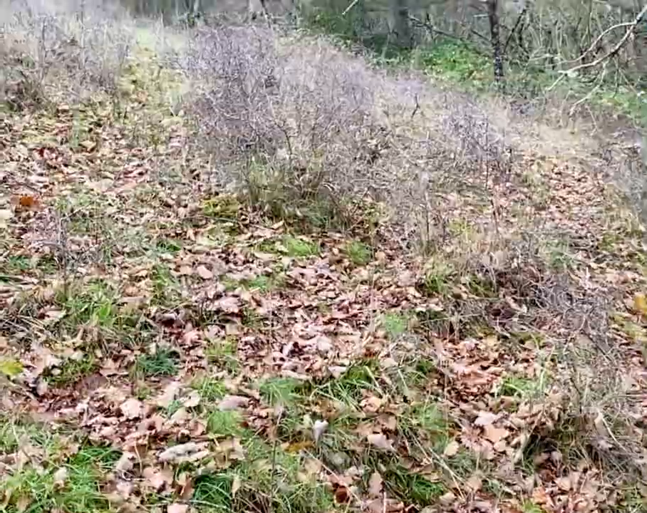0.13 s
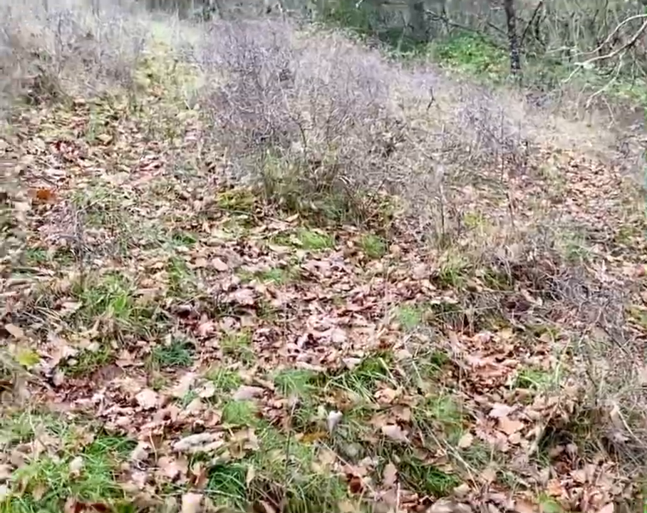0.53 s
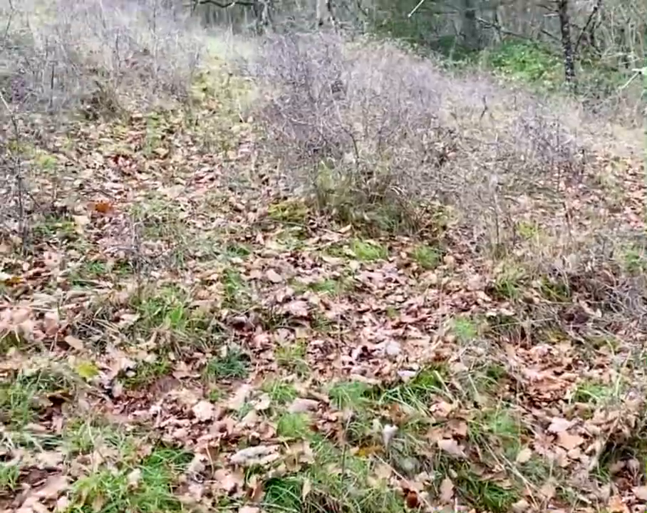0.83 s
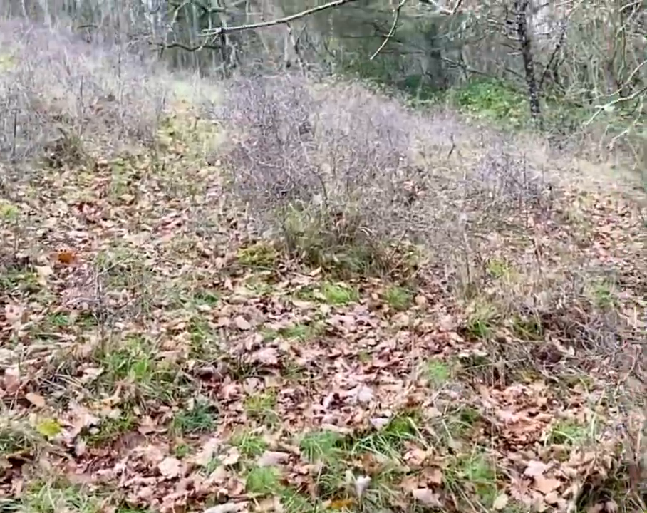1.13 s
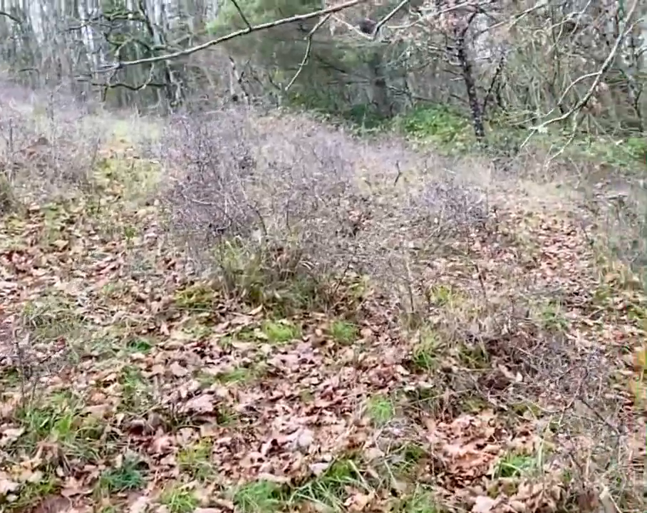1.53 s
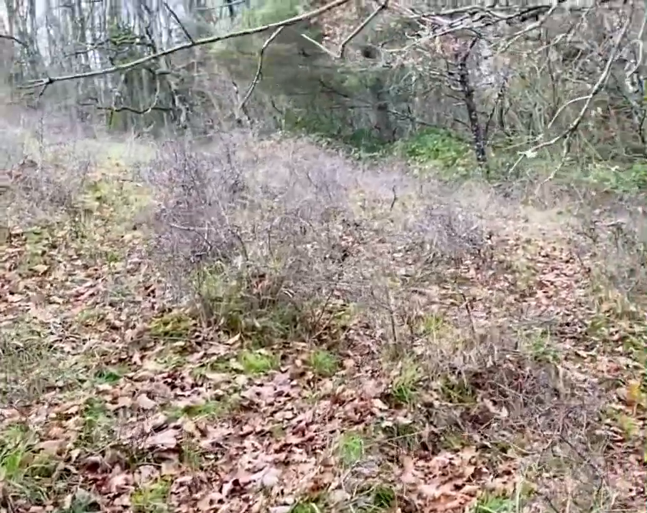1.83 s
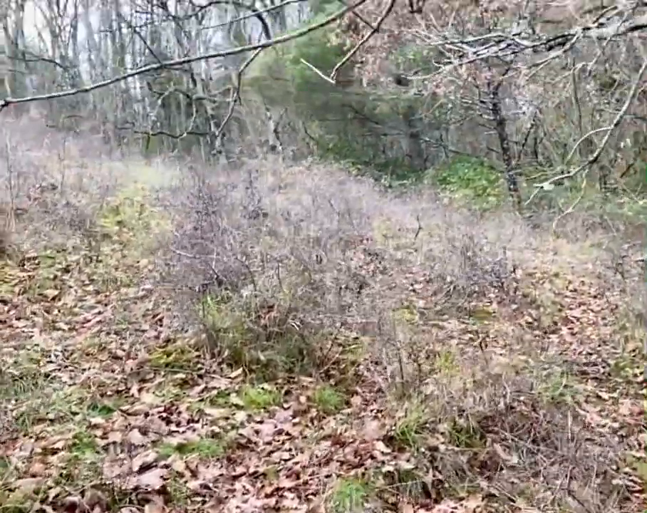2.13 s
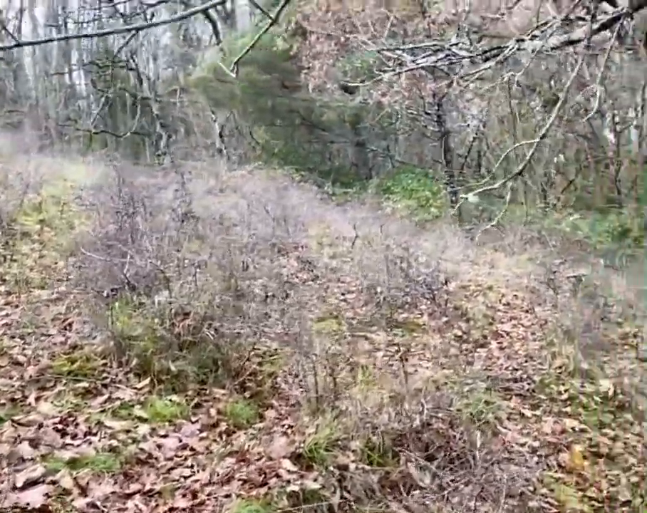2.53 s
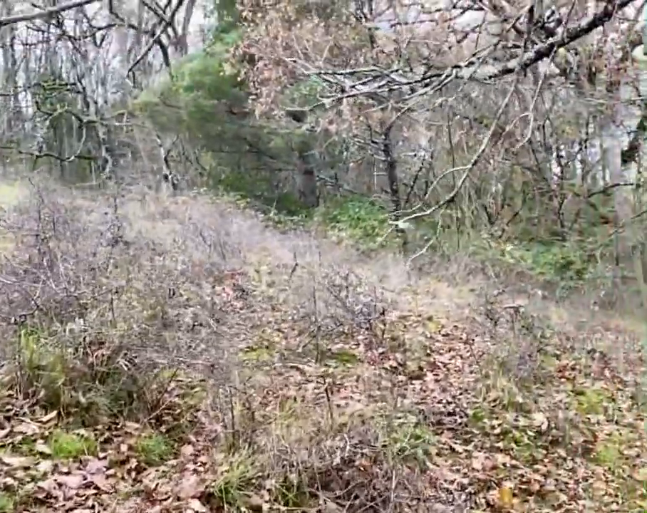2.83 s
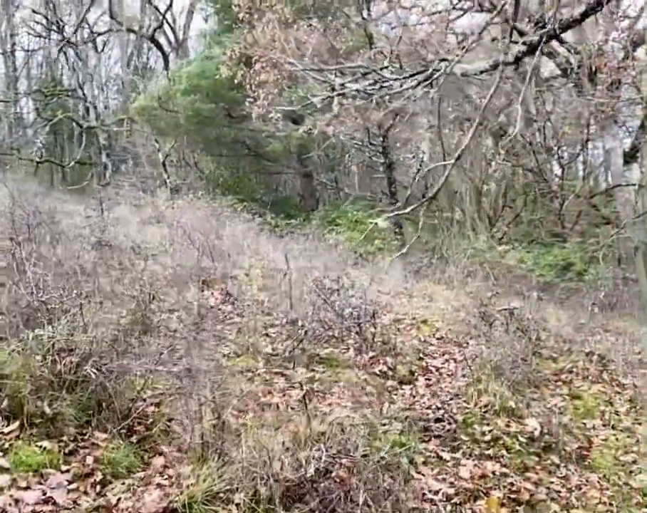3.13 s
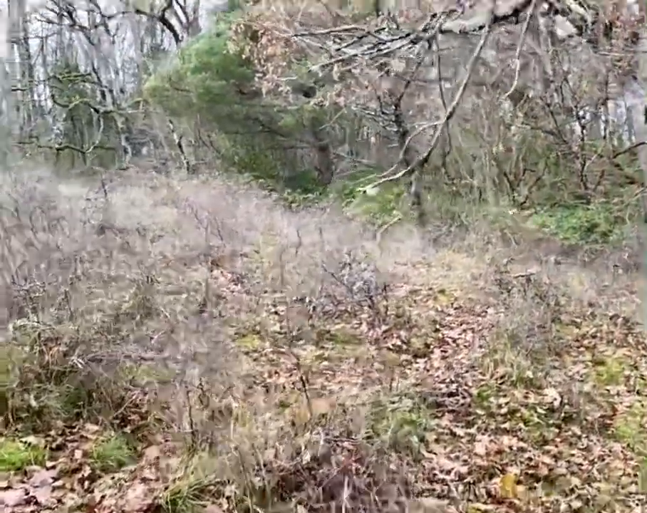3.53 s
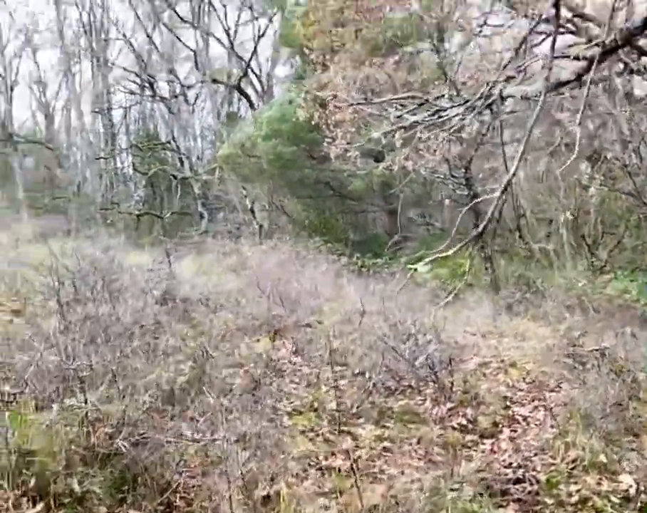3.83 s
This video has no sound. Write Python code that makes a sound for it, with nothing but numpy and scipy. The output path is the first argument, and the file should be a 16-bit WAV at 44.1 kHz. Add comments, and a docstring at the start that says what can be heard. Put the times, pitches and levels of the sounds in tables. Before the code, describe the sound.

After a near-quiet start with a dull handling knock, leaves rustle from about one second, then crunch strongly near three seconds with crisp twig cracks; close stereo outdoor pickup, dry, with little reverberation.

```python
"""A quiet wood: slow footsteps through dry leaves and brush, heard from the walker's hand.
Moves of the feet stir leaves (bright granular noise), crunch litter (darker grains) and tick stems (short sines).
Twigs snap (noise cracks and ringing modes), and grass and a sleeve brush past (shaped noise).
Soft knocks near by are sinking tones with ticks; the air is a faint hush and rumble, with a narrow whistling.
"""
import sys
import numpy as np
from scipy import signal
from scipy.fft import rfft, irfft, next_fast_len
from scipy.io import wavfile
from scipy.ndimage import uniform_filter1d, map_coordinates

SR = 44100
rng = np.random.default_rng(int(sys.argv[2]) if len(sys.argv) > 2 else 0)


def generate_wav(sig):
    """Save sig (samples, or channels by samples) to the path in sys.argv[1] as 16-bit PCM at SR."""
    pcm = np.round(np.clip(np.atleast_2d(sig).T, -1, 1) * 32767).astype(np.int16)
    wavfile.write(sys.argv[1], SR, pcm)


N = 176400
TOP_HZ = 15800  # band limit

# Level difference between the ears. Each row: frequency in Hz, left minus right in dB.
LEFT_MINUS_RIGHT = [(200, 2), (700, 2), (1300, -1), (2400, 1), (4400, 8), (8000, 3.5), (12000, -1.5)]


def amp(db):
    """Decibels to gain."""
    return 10 ** (np.asarray(db) / 20)


def unit(x):
    """Scale to rms 1."""
    return x / np.sqrt(np.mean(x ** 2) + 1e-20)


def along(points, hz):
    """Read (Hz, value) points on a log frequency axis."""
    f, v = np.transpose(points)
    return np.interp(np.log(hz + 1), np.log(f + 1), v)


def level_curve(points):
    """Join (s, dB) points by straight lines; silent outside them."""
    return np.interp(np.arange(N) / SR, *np.transpose(points), left=-np.inf, right=-np.inf)


def wobble(knots_per_s):
    """A smooth random curve through normal random knots."""
    return map_coordinates(rng.standard_normal(4096), [np.arange(N) * knots_per_s / SR], mode="wrap")


def filtered(x, response):
    """Multiply the spectrum of x by a function of frequency."""
    m = next_fast_len(N + SR // 2)
    return irfft(rfft(x, m) * response(np.fft.rfftfreq(m, 1 / SR)), m)[..., :N]


def colour(x, spectrum):
    """Shape x by a spectrum, keeping the power of white noise."""
    return filtered(x, lambda hz: unit(amp(along(spectrum, hz))))


def add(track, s, sound):
    """Mix a short sound into a track at time s."""
    part = track[..., max(0, round(s * SR)):][..., :sound.shape[-1]]
    part += sound[..., :part.shape[-1]]


def microphones(three, spectrum):
    """One shared and two separate noises become a coloured left and right at rms 1."""
    # Each row: frequency in Hz, share of power common to both sides (0 to 1).
    likeness = [(100, 0.74), (400, 0.37), (1200, 0.79), (2000, 0.88), (3500, 0.21), (7000, 0.15),
                (10000, 0.59), (14000, 1)]
    # Each row: frequency in Hz, phase by which left leads in radians.
    left_lead = [(100, 0.5), (1000, 0.54), (1800, -1), (2600, -0.5), (3700, 1.74), (5400, 2), (8300, 4.5),
                 (10000, -2), (12500, -1.5)]
    m = next_fast_len(N + 8192)
    hz, z = np.fft.rfftfreq(m, 1 / SR), rfft(three, m)
    sides = np.array([[.5], [-.5]])
    alike = np.clip(along(likeness, hz), 0, 1)
    shared = z[0] * np.sqrt(alike) * np.exp(1j * sides * along(left_lead, hz))
    pair = shared + z[1:] * np.sqrt(1 - alike)
    gain = amp(along(spectrum, hz) + sides * along(LEFT_MINUS_RIGHT, hz))
    return unit(irfft(pair * gain, m)[:, :N])


def patchy(x):
    """Let the colour of a noise drift in small patches of time and frequency."""
    depth_db = 2  # rms
    z = signal.stft(x, nperseg=512)[2]
    field = rng.standard_normal(z.shape[1:])
    field = uniform_filter1d(field, size=6, axis=0)
    field = uniform_filter1d(field, size=7, axis=1)
    return signal.istft(z * amp(depth_db * unit(field)), nperseg=512)[1][:, :N]


def narrow(hz, half_width_hz):
    """Stereo noise in one resonance, at rms 1."""
    noise = rng.standard_normal((2, N))
    return unit(filtered(noise, lambda f: 1 / (1 + ((f - hz) / half_width_hz) ** 2)))


def air():
    """Faint swaying hush of the wood, and a low rumble that is strongest near the end."""
    # Spectra of hush and rumble. Each row: frequency in Hz, relative level in dB per Hz.
    hush_spectrum = [(20, -30), (40, -30), (58, -1), (100, -3), (200, -8.5), (450, -12), (1300, -10.5),
                     (2500, -23), (3500, -27.5), (5200, -22), (10000, -30.5), (15000, -64)]
    rumble_spectrum = [(20, -19), (42, -17), (58, -2.5), (80, -10), (150, -14), (400, -19.5), (1200, -50)]
    # Level paths. Each row: time in seconds, level in dB.
    hush_path = [(0, -80.5), (.3, -67.5), (1.35, -71), (2.2, -71), (3.3, -71), (4, -67.5)]
    rumble_path = [(0, -77.5), (.3, -66.5), (.8, -71), (2.5, -87.5), (3.1, -69), (3.6, -62), (4, -64.5)]
    sway_db, sway_knots_per_s = 4, 8.1
    t = np.arange(N) / SR
    hush = patchy(microphones(rng.standard_normal((3, N)), hush_spectrum))
    rumble = microphones(rng.standard_normal((3, N)), rumble_spectrum)
    hush_db = np.interp(t, *np.transpose(hush_path)) + sway_db * wobble(sway_knots_per_s)
    rumble_db = np.interp(t, *np.transpose(rumble_path))
    return amp(hush_db) * hush + amp(rumble_db) * rumble


def knocks():
    """Soft knocks near by: a dry, chattering tick, a hollow thud that sinks in pitch and a faint scuff."""
    # Each row: start in seconds, thud level in dB, thud pitch in Hz, tick level in dB, tick low-pass in Hz.
    knock_rows = [(.082, -53, 546, -39.5, 1800), (.146, -54, 547, -42, 7000),
                  (0.4645, -26.5, 497, -22.5, 8900), (0.492, -50.5, 530, -52, 1500),
                  (0.5875, -45, 440, -29, 11800), (.671, -50, 575, -44, 2200),
                  (.691, -45.5, 935, -39, 1600), (.718, -47.5, 640, -38, 3000)]
    # Spectra of tick and scuff. Each row: frequency in Hz, relative level in dB.
    tick_spectrum = [(150, -0.5), (700, -0.5), (1500, 5), (2700, -2.5), (3400, -10.5), (4200, -9),
                     (5200, -11.5), (7000, -7.5), (11000, -12.5), (15500, -12)]
    scuff_spectrum = [(100, 2), (500, 1), (850, -11), (4000, -26), (15000, -38)]
    swell_s, sag = 0.0028, 0.13  # time to the thud's peak; pitch runs from 1 + sag to 1 - sag
    body_ratio, body_db = 0.49, -12  # lower mode of the thud
    scuff_db, scuff_t60_s = -14.5, .11
    chatter_db, chatter_t60_s = -14.5, 0.01
    right_lead_s, low_cut_hz = 0.00048, 160  # right leads on thuds only; the low cut takes thuds and scuffs
    tick_side_db = 5  # right up, left down
    t = np.arange(SR // 10) / SR
    thuds, ticks, scuffs = np.zeros(N), np.zeros(N), np.zeros((2, N))
    u = t / swell_s
    swell = (u * np.exp(1 - u)) ** 3
    for s, thud_db, hz, tick_db, muffle_hz in knock_rows:
        phase = 2 * np.pi * np.cumsum(hz * (1 + sag * (1 - 2 * np.tanh(u / 2)))) / SR
        modes = np.sin(phase) + amp(body_db) * np.sin(body_ratio * phase)
        add(thuds, s, amp(thud_db) * swell * modes)
        scuff_gain = amp(thud_db + scuff_db - 60 * t / scuff_t60_s)
        add(scuffs, s, scuff_gain * rng.standard_normal((2, len(t))))
        chatter = amp(chatter_db - 60 * t / chatter_t60_s) * rng.standard_normal(len(t))
        contact = (t == 0) + chatter
        muffle = signal.butter(2, min(muffle_hz, TOP_HZ), fs=SR)
        add(ticks, s, amp(tick_db) * signal.lfilter(*muffle, contact))
    sides = np.array([[-1], [1]])
    body = filtered(thuds, lambda hz: np.exp(1j * np.pi * sides * hz * right_lead_s))
    body = body + colour(scuffs, scuff_spectrum)
    body = filtered(body, lambda hz: (1j * hz / (low_cut_hz + 1j * hz)) ** 2)
    return body + amp(sides * tick_side_db) * colour(ticks, tick_spectrum)


def sleeve():
    """Cloth slides past close by: noise in several soft bands, its balance shifting between the sides."""
    # Each row: time in seconds, level in dB, left minus right in dB.
    path = [(.12, -87, 5), (.195, -63.5, -2), (.25, -62, 4.5), (.38, -64, 3.5), (.455, -62, -3),
            (.5, -92, 0)]
    # Each row: frequency in Hz, relative level in dB per Hz.
    cloth_spectrum = [(200, -16), (600, 0.5), (900, -20), (1450, -4.5), (2200, -3), (2800, -6.5),
                      (3700, -19.5), (4600, -8), (5500, -11), (7100, -19.5), (14000, -34.5)]
    s, db, left_db = np.transpose(path)
    t, sides = np.arange(N) / SR, np.array([[.5], [-.5]])
    level_db = level_curve(np.transpose([s, db])) + sides * np.interp(t, s, left_db)
    noise = rng.standard_normal((3, N))
    cloth = unit(colour(noise[0] + 2.3 * noise[1:], cloth_spectrum))
    return amp(level_db + 1.1 * wobble(32.3)) * cloth


def crackle(spectrum, grains_per_s, spread_db, hiss, life_s):
    """Tiny fractures of uneven size over the hiss of sliding leaves, in stereo at rms 1."""
    happens = rng.random(N) < grains_per_s / SR
    sizes = happens * amp(spread_db * np.minimum(rng.exponential(size=N), 4))
    power = signal.lfilter([1], [1, -np.exp(-1 / (SR * life_s))], sizes ** 2)
    envelope = np.hypot(unit(np.sqrt(power)), hiss)
    return unit(patchy(microphones(envelope * rng.standard_normal((3, N)), spectrum)))


def stems(strength):
    """Stems and stiff leaves tick singly, each with its own pitch and place, scaled by the moves."""
    per_s, level_db, spread_db, max_spreads = 110, -3, 2, 4.5
    centre_hz, spread_octaves, decay_cycles = 3420, 1.01, 3.4
    t = np.arange(512) / SR
    track, sides = np.zeros((2, N)), np.array([[1], [-1]])
    for when, size, pitch, place, lag in rng.random((int(per_s * N / SR), 5)):
        octaves = spread_octaves * np.sqrt(3) * (2 * pitch - 1)
        hz = min(centre_hz * 2 ** octaves, TOP_HZ)
        side_db = sides * (along(LEFT_MINUS_RIGHT, hz) / 2 + 4 * (place - .5))
        db = level_db + spread_db * min(-np.log(1 - size), max_spreads) + side_db
        ring = np.sin(2 * np.pi * hz * (t + sides * 0.000091 * (lag - .5)))
        tick = np.exp(-t * hz / decay_cycles) * ring
        add(track, when * N / SR, strength[int(when * N)] * amp(db) * tick)
    return track


def footsteps():
    """Every move swells, holds and settles; leaves and litter give way in clumps."""
    # Each row: full strength at in seconds, rise, hold and release in seconds (rise and release
    # per 20 dB), rustle level in dB, crunch level in dB.
    moves = [(0.768, 0.17, 0.036, 0.17, -70, -69.5), (0.903, 0.16, 0.069, 0.43, -62.5, -65.5),
             (1.044, 0.1, 0.028, 0.12, -52.5, -61), (1.401, 0.014, .005, 0.054, -65, -69),
             (1.617, 0.061, 0.01, 0.12, -47.5, -66.5), (1.79, 0.46, 0.076, 0.17, -52, -64.5),
             (1.939, 0.16, 0.019, 0.11, -48, -59), (2.081, 0.17, 0.25, 0.53, -63.5, -63),
             (2.573, 0.23, 0.024, 0.11, -57.5, -62.5), (2.728, 0.075, 0.054, 0.14, -42.5, -49.5),
             (2.805, 0.18, 0.046, 0.23, -39.5, -50), (3.002, 0.12, 0.03, 0.2, -47, -47),
             (3.133, 0.17, 0.092, 1, -59.5, -58), (3.392, 0.025, 0.015, 0.14, -44.5, -50),
             (3.478, 0.1, 0.078, 0.09, -46, -49), (3.653, 0.072, 0.014, 0.24, -49.5, -52),
             (3.874, 0.041, 0.057, 0.2, -47.5, -57), (3.977, 0.2, .04, .2, -57.5, -47.5)]
    # Spectra of leaves and litter. Each row: frequency in Hz, relative level in dB per Hz.
    leaf_spectrum = [(200, -37.5), (800, -19.5), (1700, -1.5), (3000, 0.5), (4000, -0.5), (4800, 0.5),
                     (6000, -3), (7400, 0), (8400, -4.5), (10900, -7.5), (12100, -24.5), (13700, -13),
                     (15600, -46)]
    litter_spectrum = [(80, -14), (250, -13), (430, -12.5), (650, -3.5), (900, 0), (1350, -0.5), (1900, -3),
                       (2700, -19), (6000, -10.5), (14000, -34)]
    clump_db, clumps_per_s = 1.4, 260
    t = np.arange(N) / SR
    leaf_power, litter_power = np.zeros(N), np.zeros(N)
    for s, rise, hold, release, rustle_db, crunch_db in moves:
        shape_db = -20 * (np.maximum(s - t, 0) / rise + np.maximum(t - s - hold, 0) / release)
        leaf_power += amp(rustle_db + shape_db) ** 2
        litter_power += amp(crunch_db + shape_db) ** 2
    leaf_clumps = unit(amp(clump_db * wobble(clumps_per_s)))
    litter_clumps = unit(amp(clump_db * wobble(clumps_per_s)))
    rustle = crackle(leaf_spectrum, grains_per_s=2900, spread_db=3, hiss=0.59, life_s=0.0012)
    crunch = crackle(litter_spectrum, grains_per_s=600, spread_db=2, hiss=0.65, life_s=0.0018)
    leaves = np.sqrt(leaf_power) * leaf_clumps * rustle
    litter = np.sqrt(litter_power) * litter_clumps * crunch
    return leaves + litter + stems(np.sqrt(leaf_power + litter_power))


def twigs():
    """A twig breaks with a sharp crack and rings briefly in two quick stages; light stalks ping."""
    # Breaks. Each row: start in seconds, ring level in dB, ring pitch in Hz, crack level in dB (5 dB is taken off).
    snaps = [(1.169, -55, 1500, -58), (1.397, -43.5, 3600, -57), (1.609, -41, 7200, -50),
             (1.6755, -38.5, 2880, -41.5), (1.753, -42, 6600, -45), (1.757, -45, 6650, -44.5),
             (1.771, -39, 2620, -42), (1.796, -38, 6700, -37), (1.8155, -40, 2820, -31),
             (1.826, -34, 7100, -47), (1.9215, -33, 2630, -57), (1.958, -35, 3520, -44),
             (2.383, -43, 1900, -42.5), (2.452, -39.5, 1300, -36), (2.644, -43.5, 1870, -41.5),
             (2.727, -33, 7400, -34), (2.761, -28, 1370, -36), (2.771, -30, 2550, -39),
             (2.790, -29, 1370, -46), (2.799, -23.5, 1580, -44), (2.8245, -18.5, 1380, -29),
             (2.8275, -27, 1290, -32), (2.831, -24, 2040, -33), (2.8352, -32, 1440, -37),
             (2.854, -26.5, 1240, -41), (3.167, -35.5, 780, -38.5), (3.357, -35, 730, -54),
             (3.447, -31.5, 1270, -44), (3.453, -29, 3280, -40), (3.483, -25.5, 2070, -41),
             (3.488, -40, 2880, -35.5), (3.5316, -19.5, 1600, -33.5), (3.639, -21, 1020, -40),
             (3.687, -22.5, 1380, -31.5), (3.702, -30.5, 1670, -40.5), (3.829, -39, 2630, -43),
             (3.875, -15.5, 7600, -17), (3.969, -24.5, 1450, -39)]
    # Modes of a twig. Each row: ratio to its main pitch, level in dB.
    modes = [(.63, -21), (1, 0.5), (1.45, -12)]
    # Light stalks. Each row: start in seconds, level in dB, pitch in Hz.
    pings = [(.718, -53, 2190), (1.147, -50, 790)]
    # Each row: frequency in Hz, relative level in dB.
    crack_spectrum = [(300, -22), (900, -12), (1500, -0.5), (3500, 6), (5200, 6), (7300, 5.5), (9500, -4.5),
                      (12000, -13.5), (15500, -14)]
    ring_t60_s, ping_t60_s, crack_s, attack_s = 0.0066, 0.027, 0.0029, 0.00068
    splinter_max_s, splinter_db = 0.001652, -3.5  # the last fibres give way just after the first
    side_db, left_lead_s = 3, .0001  # cracks come from the left: left up, right down
    t = np.arange(SR // 20) / SR
    rings, cracks = np.zeros(N), np.zeros((3, N))
    onset = 1 - np.exp(-t / attack_s)
    for s, ring_db, hz, crack_db in snaps:
        splinter_s = splinter_max_s * rng.uniform(0.742, 1.0)
        for delay, db in [(0, 0), (splinter_s, splinter_db)]:
            ring = np.zeros(len(t))
            for ratio, mode_db in modes:
                mode_hz = hz * ratio * np.exp(rng.normal(0, 0.04))
                ring += amp(mode_db) * np.sin(2 * np.pi * mode_hz * t)
            add(rings, s + delay, amp(ring_db + db - 60 * t / ring_t60_s) * onset * ring)
        burst = np.exp(-(t / crack_s) ** 2) * onset * rng.standard_normal((3, len(t)))
        add(cracks, s, amp(crack_db - 5) * burst)
    for s, db, hz in pings:
        add(rings, s, amp(db - 60 * t / ping_t60_s) * onset * np.sin(2 * np.pi * hz * t))
    cracks = colour(cracks, crack_spectrum)
    sides = np.array([[1], [-1]])
    direct = filtered(cracks[0], lambda hz: np.exp(1j * np.pi * sides * hz * left_lead_s))
    return rings + amp(sides * side_db) * (direct + 1.03 * cracks[1:])


def grass():
    """Thin dry blades slide along a leg: one bright swell of resonant noise."""
    at_s, half_s = 1.07, .05
    level_db, hz, half_width_hz = -54, 4700, 790
    swell = np.exp(-((np.arange(N) / SR - at_s) / half_s) ** 2)
    sides_db = along(LEFT_MINUS_RIGHT, hz) * np.array([[.5], [-.5]])
    return amp(level_db + sides_db) * swell * narrow(hz, half_width_hz)


def whistling():
    """A faint distant whistling: a thin, centred band of noise that swells and fades."""
    # Each row: time in seconds, level in dB.
    whistle_path = [(1.15, -96), (1.26, -79), (1.45, -72), (1.53, -92)]
    return amp(level_curve(whistle_path)) * narrow(hz=1265, half_width_hz=39)[0]


def wood(x):
    """A short scatter from the ground and the trunks: decaying noise as an impulse response."""
    t60_s = 0.1
    t = np.arange(SR // 2) / SR
    tail = rng.standard_normal((2, len(t))) * amp(-60 * t / t60_s)
    return signal.fftconvolve(x, tail / np.linalg.norm(tail[0]), axes=1)[:, :N]


def scene():
    """Feet, grass and twigs scatter in the wood; knocks, sleeve, air and whistling stay direct."""
    wood_db = -10.5
    ground = footsteps() + grass() + twigs()
    return ground + amp(wood_db) * wood(ground) + knocks() + sleeve() + air() + whistling()


def record(dry):
    """The microphones drop the deepest bass and keep nothing above the band limit."""
    low_cut_hz = 32
    return filtered(dry, lambda hz: (hz < TOP_HZ) * hz ** 4 / np.hypot(hz ** 4, low_cut_hz ** 4))


dry = scene()
out = record(dry)
generate_wav(out)
```